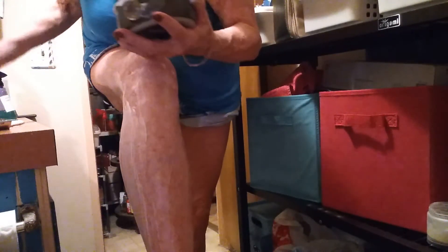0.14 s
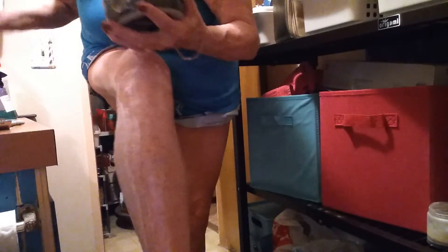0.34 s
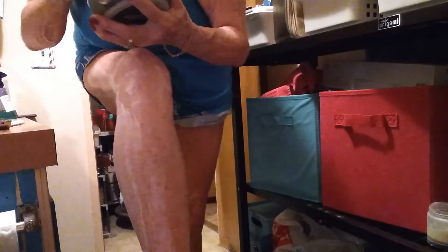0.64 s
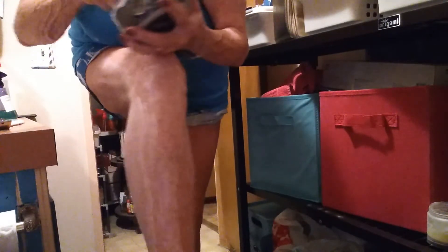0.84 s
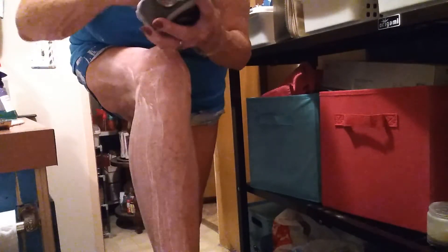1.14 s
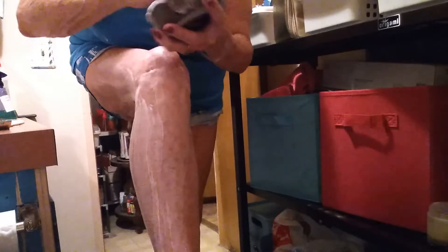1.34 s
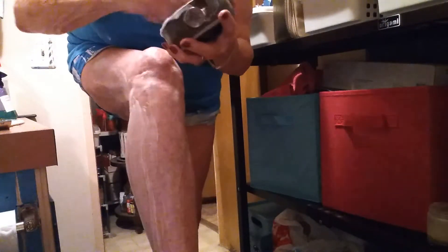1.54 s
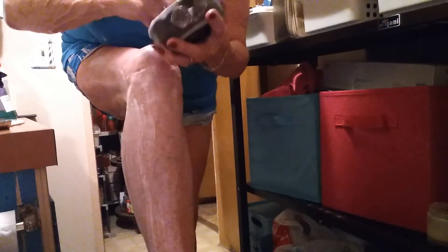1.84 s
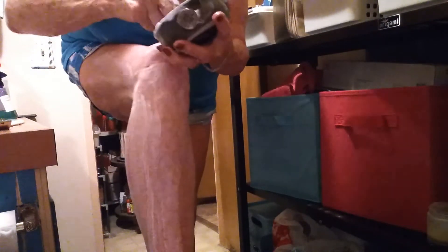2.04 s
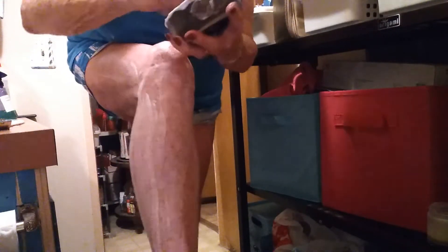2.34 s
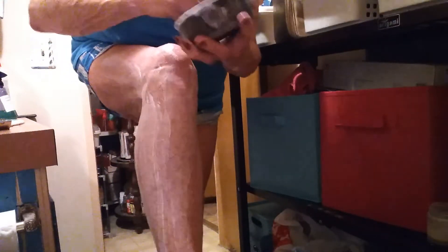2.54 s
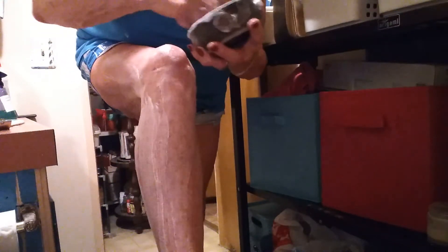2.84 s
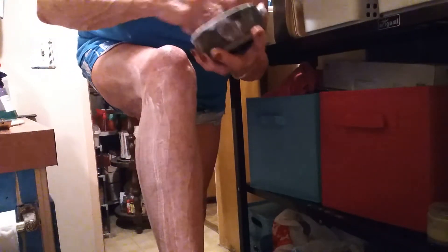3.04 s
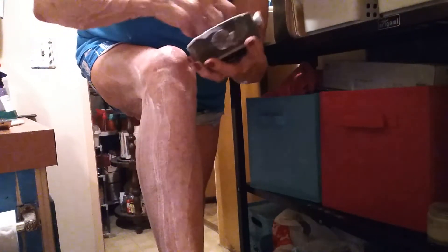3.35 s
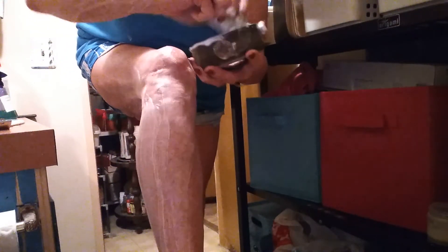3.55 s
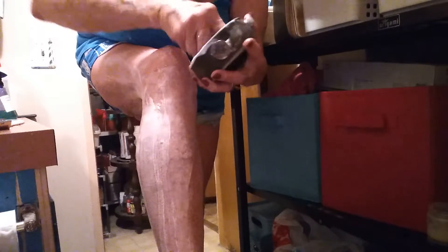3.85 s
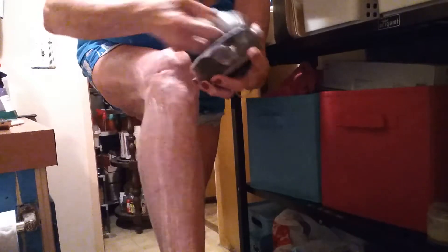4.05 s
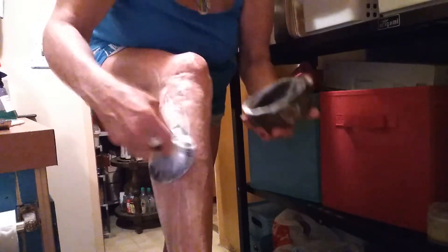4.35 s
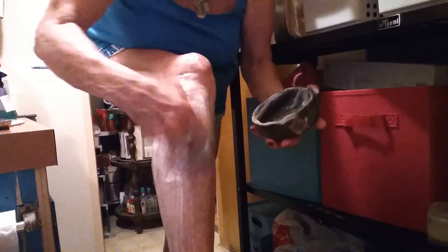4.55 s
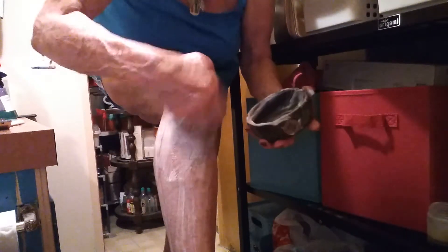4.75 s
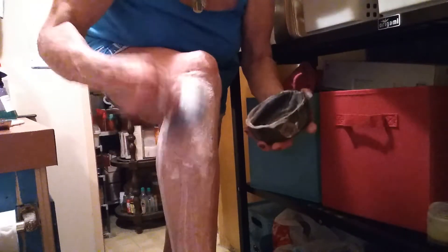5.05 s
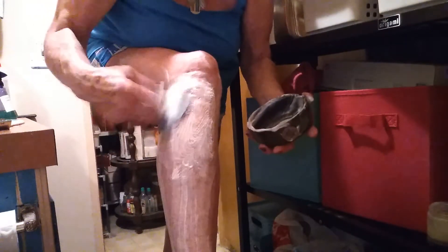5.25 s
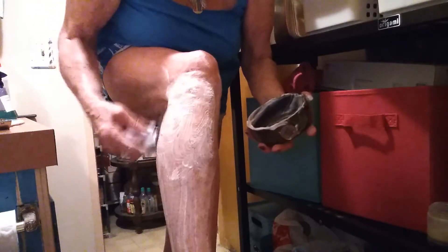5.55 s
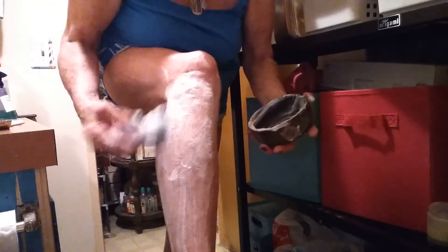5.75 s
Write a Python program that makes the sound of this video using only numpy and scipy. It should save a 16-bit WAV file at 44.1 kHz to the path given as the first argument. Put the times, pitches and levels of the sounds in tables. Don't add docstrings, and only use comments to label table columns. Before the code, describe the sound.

Quick scratchy swishing of bristles in a hollow bowl, broken by two bright clacks, slows, then becomes duller, quieter rubbing on a shin.

```python
import sys
import numpy as np
from scipy import signal
from scipy.fft import rfft, irfft, next_fast_len
from scipy.io import wavfile
from scipy.ndimage import uniform_filter1d

SR = 44100
rng = np.random.default_rng(int(sys.argv[2]) if len(sys.argv) > 2 else 0)


def ratio(d):
    e = np.asarray(d, float) / 20
    return 10 ** e


def int16_out(signal):
    q = np.round(np.clip(np.atleast_2d(signal).T, -1, 1) * 32767)
    wavfile.write(sys.argv[1], SR, q.astype(np.int16))


N = 259749


def evened(x):
    return x / np.sqrt(np.mean(x ** 2) + 1e-20)


def read(points, hz):
    f, value = np.transpose(points)
    return np.interp(np.log(hz + 1), np.log(f + 1), value)


def colour(x, points):
    size = next_fast_len(N)
    gain = ratio(read(points, np.fft.rfftfreq(size, 1 / SR)))
    return irfft(rfft(x, size) * gain, size)[..., :N]


def narrow_band(x, hz, width_hz):
    return signal.lfilter(*signal.iirpeak(hz, hz / width_hz, SR), x)


def ring(hz, t60, size=6000):
    t = np.arange(size) / SR
    return ratio(-60 * t / t60) * np.sin(2 * np.pi * hz * t)


def add(mix, s, sound):
    part = mix[..., round(s * SR):][..., :sound.shape[-1]]
    part += sound[..., :part.shape[-1]]


def slips(per_s, spread_db):
    size = ratio(spread_db * np.minimum(rng.exponential(1, (4, N)), 5))
    happens = rng.random((4, N)) < per_s / SR
    return evened(size * rng.standard_normal((4, N)) * happens)


def resonate(x, modes, patchy_db):
    steps = evened(uniform_filter1d(rng.standard_normal((len(modes), N // 441 + 2)), 5, axis=1))
    out = 0
    for (hz, width_hz, db), step in zip(modes, steps):
        wander = np.interp(np.arange(N) / 441, np.arange(len(step)), step)
        out = out + narrow_band(x * ratio(db + patchy_db * wander), hz, width_hz)
    return out


# peak in seconds, length in seconds, pressure in dB, foam in dB.
WHIP_STROKES = [(0.367, 0.047, -72, -66.5), (0.46, 0.079, -55.5, -66.5), (0.562, 0.12, -48.5, -69),
                (0.668, 0.053, -41, -57), (0.739, 0.063, -45, -61), (0.837, 0.1, -45, -63),
                (0.934, 0.056, -57, -59.5), (1.016, 0.055, -43, -58), (1.092, 0.059, -46, -58.5),
                (1.13, 0.029, -68, -60.5), (1.188, 0.067, -38, -54.5), (1.267, 0.06, -45, -58),
                (1.432, 0.085, -49, -63), (1.544, 0.065, -43.5, -60), (1.716, 0.036, -53, -63.5),
                (1.778, 0.055, -46.5, -63), (1.887, 0.079, -47, -60), (1.964, 0.11, -52.5, -63.5),
                (2.162, 0.12, -48.5, -60), (2.280, 0.096, -42, -56.5), (2.379, 0.067, -44.5, -60.5),
                (2.484, 0.076, -43, -57.5), (2.583, 0.098, -47.5, -59), (2.686, 0.077, -43, -58),
                (2.773, 0.074, -43, -58), (2.875, 0.069, -41, -56), (2.961, 0.087, -46, -59.5),
                (3.056, 0.059, -44.5, -58), (3.138, 0.087, -51, -63.5)]
# peak in seconds, length in seconds, pressure in dB, foam in dB.
SWIRL_STROKES = [
    (3.306, .06, -54.5, -75),
    (3.396, 0.16, -58.5, -60),
    (3.518, 0.23, -54.5, -61),
    (3.664, 0.21, -56, -66.5),
    (3.860, 0.43, -60.5, -85),
]
# peak in seconds, length in seconds, pressure in dB, foam in dB.
SHIN_STROKES = [(4.047, 0.057, -53.5, -61), (4.15, 0.13, -59.5, -62.5), (4.28, 0.083, -50, -55.5),
                (4.38, 0.074, -48, -57.5), (4.470, 0.058, -55.5, -64), (4.562, 0.085, -48, -58.5),
                (4.666, 0.077, -51, -62), (4.743, 0.077, -53.5, -60.5), (4.848, 0.061, -55, -61),
                (4.938, 0.05, -62, -63), (5.02, 0.066, -56, -61), (5.108, 0.067, -57, -64),
                (5.187, .1, -62, -70.5), (5.334, 0.064, -66, -62), (5.482, 0.25, -67, -64.5),
                (5.676, 0.059, -54.5, -62), (5.773, 0.1, -61, -60), (5.857, 0.12, -73, -61.5)]
# time in seconds, level in dB.
RESTING_WEIGHT = [(0, -90), (.32, -78), (.4, -65.5), (.6, -62.5), (1.2, -60), (1.5, -67), (1.62, -61),
                  (1.84, -72), (2.3, -62), (2.9, -65), (3.22, -66.5), (3.7, -70), (3.8, -74), (4.0, -76),
                  (4.3, -65), (5.0, -69.5), (5.3, -79), (5.89, -70)]


def effort(column, end_db, lag_s, rest_db):
    t = np.arange(0, N + 64, 64) / SR
    rows = np.array(WHIP_STROKES + SWIRL_STROKES + SHIN_STROKES)
    peak_s, length_s, peak_db = rows[:, :1], rows[:, 1:2], rows[:, column:column + 1]
    x = (t - lag_s - peak_s) / (0.5 * length_s)
    x = x / (1 + 0.063 * np.sign(x))
    humps = ratio(peak_db + end_db * x ** 2)
    rest = ratio(rest_db + np.interp(t, *np.transpose(RESTING_WEIGHT)))
    return np.interp(np.arange(N) / SR, t, np.sqrt((humps ** 2).sum(0) + rest ** 2))


# pitch in Hz, width in Hz, level in dB.
BOWL_TONES = [(801, 31, 2.5), (1101, 49, -2), (1290, 37, -3.5), (1470, 28, -11), (2014, 50, -5),
              (2584, 33, -5), (638, 66, -9)]
# pitch in Hz, width in Hz, level in dB.
SKIN_TONES = [(620, 16, 1), (655, 32, 4), (823, 63, 0), (1090, 140, -4), (1440, 51, -25), (1850, 2400, -10)]
# pitch in Hz, level in dB.
RASP_COLOUR = [(150, -23), (400, -5), (900, -1), (1600, -1.5), (2500, -6), (4000, -12.5), (8000, -20),
               (14000, -28.5)]
# pitch in Hz, level in dB.
FOAM_COLOUR = [(300, -7), (1200, 8), (2500, 6.5), (5000, 4), (8000, 1), (11000, -1), (14000, -5.5),
               (16000, -9)]


def brush():
    rub = slips(9000, 1.34) * effort(column=2, end_db=-10, lag_s=0, rest_db=6)
    on_skin = np.clip((np.arange(N) / SR - 3.95) / 0.046, 0, 1)
    bowl = ratio(14.5) * resonate(rub * (1 - on_skin), BOWL_TONES, patchy_db=4.0)
    shin = ratio(11) * resonate(rub * on_skin, SKIN_TONES, patchy_db=5.0)
    rasp = ratio(9.0) * colour(rub, RASP_COLOUR)
    foam = ratio(8) * colour(slips(14000, 1.9), FOAM_COLOUR)
    foam = foam * effort(column=3, end_db=-6.5, lag_s=0.0047, rest_db=-3)
    return bowl + shin + rasp + foam


# pitch in Hz, time to fall 60 dB in seconds.
ROOM_FADE = [(300, 0.16), (1000, 0.26), (2200, 0.2), (5000, 0.23), (10000, 0.23)]


def room(x):
    echoes = np.zeros((4, 14000))
    at = np.arange(60, 13980, 20) + rng.integers(0, 20, (4, 696))
    np.put_along_axis(echoes, at, rng.choice([-1., 1.], at.shape), 1)
    echoes *= np.minimum(np.arange(14000) / SR / 0.0036, 1)
    hz, t, z = signal.stft(echoes, SR, nperseg=128)
    fade = ratio(-60 * t / read(ROOM_FADE, hz)[:, None])
    tail = signal.istft(z * fade, SR, nperseg=128)[1]
    return signal.fftconvolve(x[None], tail / np.linalg.norm(tail[0]), axes=1)


def wet_spray(blow_db, size):
    fade = ratio(blow_db - 15 - 60 * np.arange(size) / SR / 0.02)
    spray = fade * rng.standard_normal(size)
    whistle = narrow_band(spray, 9600, 570)
    hiss = signal.lfilter(*signal.butter(2, [500, 7500], "bandpass", fs=SR), spray)
    return hiss + ratio(5) * whistle


# start in seconds, then blow, crack, room and thud in dB.
RIM_KNOCKS = [
    (1.2940, -8.5, 7, 6.5, -25),
    (2.0047, -12, 3, 7.5, -42),
]
# pitch in Hz, time to fall 60 dB in seconds,
# level in dB in the first knock, level in dB in the second knock.
RIM_TONES = [(797, 0.036, -11, -2), (1110, 0.031, -43, -9), (1410, 0.016, -30, -8), (2040, 0.037, -43, -27),
             (2210, 0.067, 10.5, 8), (2336, 0.06, 8, 13), (2590, 0.056, -3, -8), (3220, 0.019, -8, -4),
             (3670, 0.018, -7, -22), (3854, 0.018, -5, -4), (4345, 0.024, 3, 9), (4580, 0.013, 9, 5.5),
             (5460, 0.028, -6, -5), (6160, 0.019, -14, -9), (6670, 0.033, -13, -6), (7890, 0.031, -9, -11),
             (9170, 0.041, -19, -3.5), (10100, 0.027, -17, -18), (12500, 0.012, -30, -26)]


def knocks():
    out = np.zeros((4, N))
    radiated = signal.butter(2, [650, 10500], "bandpass", fs=SR)
    for k, (s, blow_db, crack_db, room_db, thud_db) in enumerate(RIM_KNOCKS):
        rim = 0.29 * ratio(blow_db) * sum(ratio(row[2 + k]) * ring(*row[:2]) for row in RIM_TONES)
        rim = signal.lfilter(*radiated, rim)
        crack = ratio(blow_db + crack_db)
        tick = crack * (0.54 * ring(3990, 0.0087) + 1.22 * ring(6330, 0.0036) + 0.33 * ring(9220, 0.0099))
        landing = -crack * (ring(1930, 0.0056) + 0.067 * ring(1015, 0.0069))
        thud = ratio(thud_db) * ring(110, 0.04)
        spray = wet_spray(blow_db, len(rim))
        add(out[0], s, rim + tick + thud)
        add(out[0], s + 0.0006, landing + spray)
        add(out[1], s, 0.6 * tick + 0.44 * rim)
        add(out[1], s + 0.00055, 0.14 * landing)
        add(out[2], s + 0.0007, 1.07 * tick)
        for bounce in range(1, 5):
            add(out[bounce % 2], s + 0.0098 * bounce, ratio(-4.0 * bounce) * rim)
        add(out, s, ratio(room_db) * room(0.68 * rim + 0.24 * tick + 0.1 * landing + spray))
    return out


# start in seconds, peak in dB, pitch in Hz, time to fall 60 dB in seconds, tick in dB.
SMALL_TAPS = [(0.353, -44, 776, 0.028, -19), (0.445, -42, 730, 0.03, -22), (0.845, -36.5, 1290, 0.069, -25),
              (1.524, -38, 854, 0.12, -33), (4.022, -39.5, 620, 0.051, -18),
              (4.035, -38.5, 608, 0.049, -21), (4.055, -39, 660, 0.027, -21), (4.225, -44, 814, 0.032, -15),
              (4.489, -39.5, 674, 0.037, -22), (4.527, -42, 594, 0.028, -24),
              (4.915, -45, 1050, 0.021, -16), (4.972, -46.5, 1010, 0.035, -16),
              (5.668, -41, 734, 0.015, -18)]
# start in seconds, peak in dB, pitch in Hz, time to fall 60 dB in seconds, tick in dB.
RING_CLINKS = [
    (0.6, -34.5, 4300, 0.014, -10),
    (.9335, -31.5, 4320, 0.024, 10),
    (0.9334, -55, 3400, 0.014, -20),
    (1.1185, -33, 4300, 0.02, 7.5),
    (4.1, -48, 3250, .008, -4),
]


def taps():
    dry = np.zeros(N)
    tick = ring(6500, 0.0036) + ring(9500, 0.0038) + 0.67 * ring(7600, 0.002) + 0.6 * ring(12300, 0.002)
    for s, db, hz, t60, tick_db in list(SMALL_TAPS) + list(RING_CLINKS):
        tone = ring(hz, max(t60, 0.004))
        add(dry, s, ratio(db) * (tone + ratio(tick_db - 5) * tick))
    wet = ratio(-4.5) * room(dry)[:, :N]
    return wet + dry * np.array([[1], [0.5], [0], [0]])


# middle in seconds, length in seconds, level in dB, pitch in Hz.
DRONE_SWELLS = [(.3, 0.98, -62.5, 292.3), (1.148, 0.61, -58, 344), (1.65, 0.32, -59, 341),
                (1.9, 0.57, -62, 301), (2.45, .3, -63, 344.5), (2.9, 0.58, -66.5, 347),
                (3.097, 0.47, -61.5, 298.5), (3.8, 0.68, -64.5, 329.7), (4.49, 0.84, -62, 345.5),
                (5.68, .55, -64.5, 342)]


def drone():
    t = np.arange(N) / SR
    hold = np.exp(-np.pi * 35 / SR)
    fuzz = rng.standard_normal((4, N)) + 1j * rng.standard_normal((4, N))
    for _ in range(2):
        fuzz = signal.lfilter([1], [1, -hold], fuzz)
    swells = 0
    for s, length, db, hz in DRONE_SWELLS:
        rise_and_fall = np.cos(np.pi * np.clip((t - s) / length, -0.5, 0.5))
        swells = swells + ratio(db) * rise_and_fall * np.exp(2j * np.pi * hz * t)
    return ratio(2.5) * (fuzz * swells).real / fuzz.real.std()


# pitch in Hz, level in dB.
HUM_COLOUR = [(25, -58), (45, 1.5), (65, -2), (130, -2), (250, -2.5), (500, -8), (800, -15), (1500, -20),
              (3000, -21), (6000, -24.5), (10000, -28), (14000, -32.5)]


def hum():
    sway_db = evened(uniform_filter1d(rng.standard_normal(N), 6000))
    return ratio(-55.5 + sway_db) * evened(colour(rng.standard_normal((4, N)), HUM_COLOUR))


# pitch in Hz, lag in radians.
PORT_LAG = [(30, 0.33), (150, 0.0032), (350, 0.53), (700, 0.49), (1200, 0), (15000, 0)]
# pitch in Hz, level in dB.
RIGHT_SIDE = [(100, 10), (3500, -10.5), (5000, -21), (8000, -35), (14000, -2)]
# pitch in Hz, level in dB.
ONE_PORT = [(30, 1.5), (100, 0.5), (1000, -19), (3500, -10.5), (5500, -4), (9000, 5), (14000, -4)]


def ports(x):
    size = next_fast_len(N)
    hz = np.fft.rfftfreq(size, 1 / SR)
    left, right, only_left, only_right = rfft(x, size)
    travel_s = 0.0004437
    late = -np.exp(-1j * (2 * np.pi * hz * travel_s + read(PORT_LAG, hz)))
    far, lone = ratio(read(RIGHT_SIDE, hz)), ratio(read(ONE_PORT, hz))
    left_port = left + far * late * right + lone * only_left
    right_port = late * left + far * right + lone * only_right
    pair = np.array([left_port, right_port]) / np.sqrt(1 + far ** 2 + lone ** 2)
    return irfft(pair, size)[:, :N]


def scene():
    return ports(brush() + knocks() + taps() + drone() + hum())


def roll_off(x):
    return signal.sosfilt(signal.butter(12, 15640, fs=SR, output="sos"), x)


def record(dry):
    power = uniform_filter1d((dry ** 2).mean(0), 400, origin=199)
    power_db = 10 * np.log10(abs(power) + 1e-12)
    fall = np.arange(N) * 29.6 / SR
    held_db = np.maximum.accumulate(power_db + fall) - fall
    over_db = np.maximum(held_db + 35, 0)
    ducked = dry / ratio(0.4 * uniform_filter1d(over_db, 1500, origin=749))
    edged = colour(np.tanh(ducked), [(14200, 0), (14400, -16), (15400, -30), (15900, -75)])
    return roll_off(edged)


dry = scene()
out = record(dry)
int16_out(out)
```